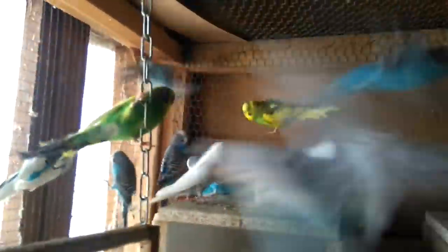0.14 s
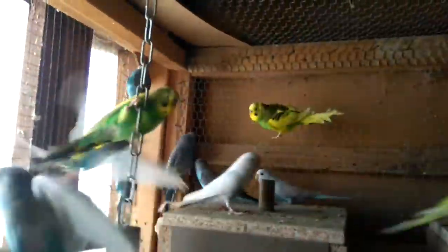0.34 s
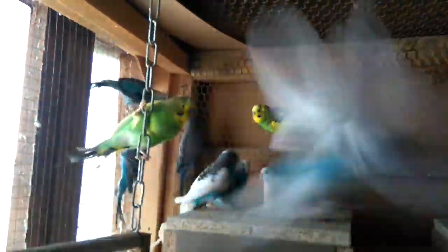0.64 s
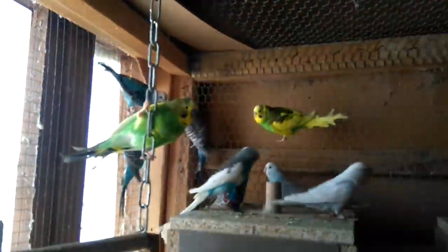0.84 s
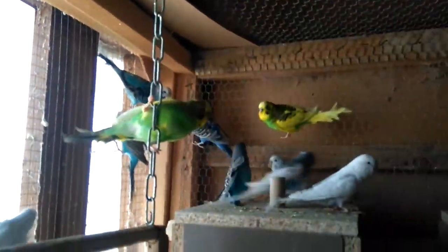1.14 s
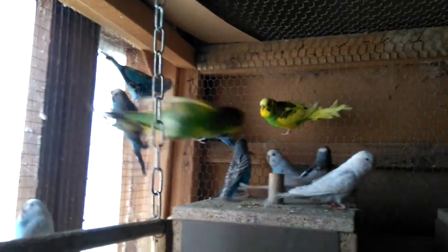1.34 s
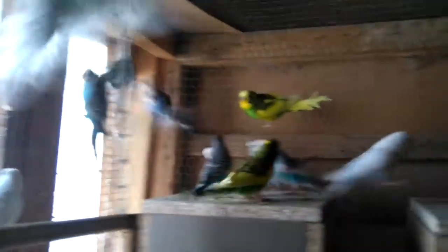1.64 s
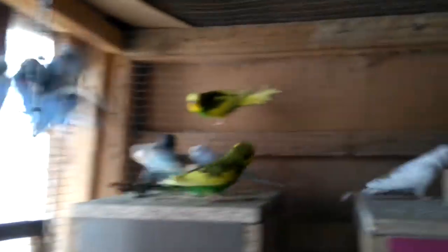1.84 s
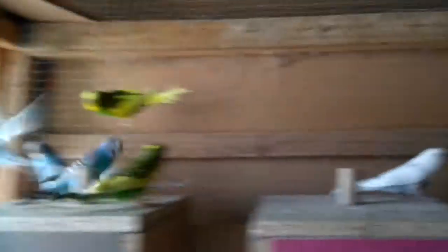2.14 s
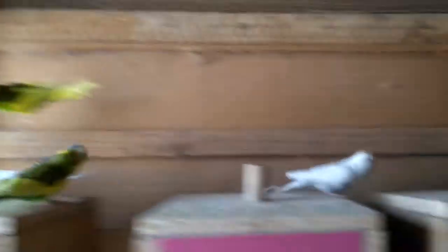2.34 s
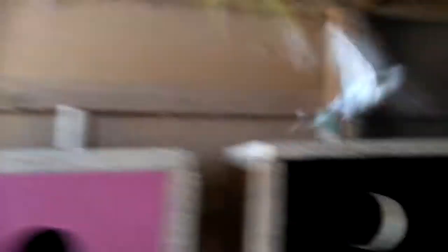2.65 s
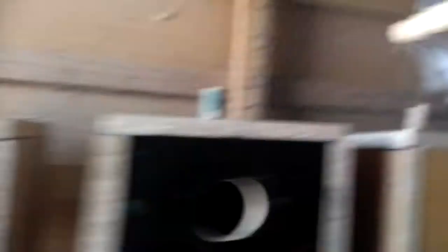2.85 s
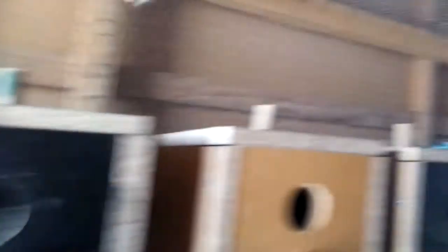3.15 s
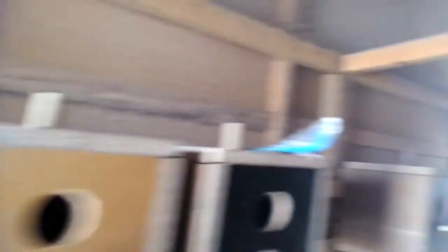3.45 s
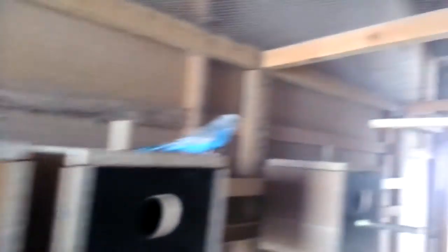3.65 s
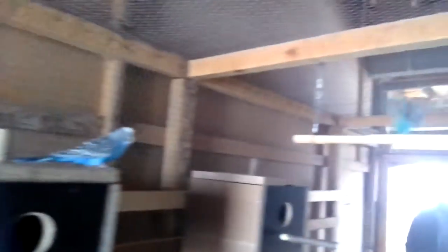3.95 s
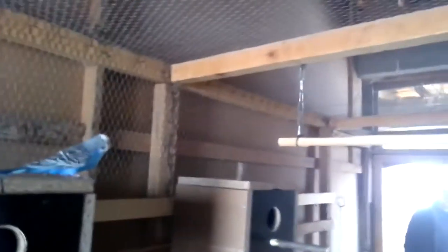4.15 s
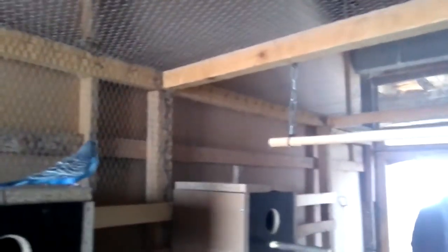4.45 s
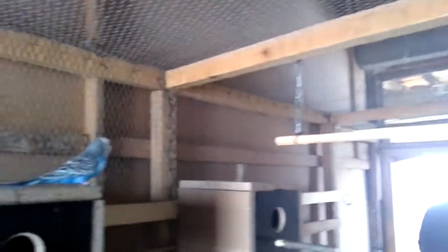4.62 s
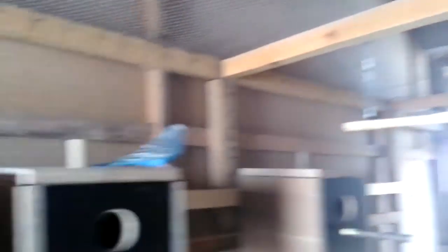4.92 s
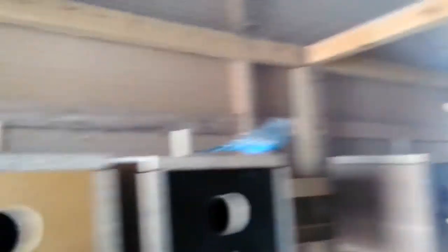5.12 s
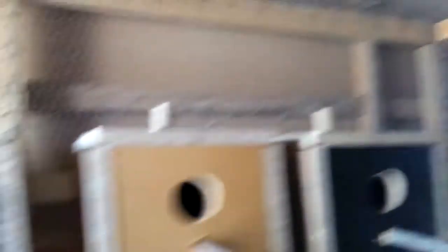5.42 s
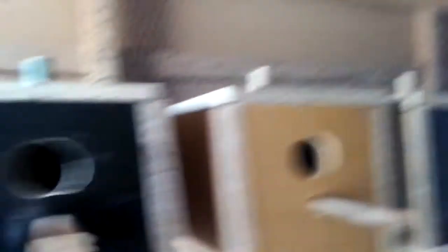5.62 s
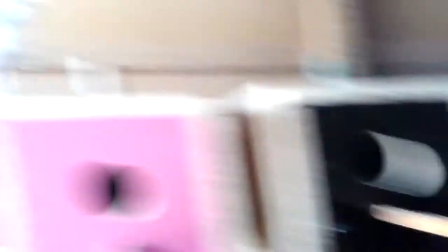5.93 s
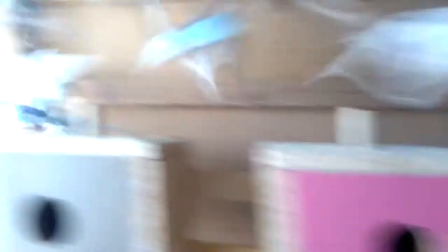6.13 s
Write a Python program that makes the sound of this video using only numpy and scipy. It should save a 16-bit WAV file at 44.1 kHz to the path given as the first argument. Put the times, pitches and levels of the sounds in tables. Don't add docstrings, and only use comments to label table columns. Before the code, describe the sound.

A flock of small parrots chirps, whistles and squawks inside a wooden aviary, with sharp wing claps, fluttering and soft knocks close to the microphone.

```python
import sys
import numpy as np
from scipy import signal
from scipy.fft import rfft, irfft
from scipy.io import wavfile
from scipy.ndimage import uniform_filter1d

SR = 44100
rng = np.random.default_rng(int(sys.argv[2]) if len(sys.argv) > 2 else 0)


def output_pcm(signal):
    pcm = np.clip(np.atleast_2d(signal).T, -1, 1) * 32767
    wavfile.write(sys.argv[1], SR, np.round(pcm).astype(np.int16))


def rack_gain(trim_db):
    fader = np.asarray(trim_db, float)
    return 10 ** (fader / 20)


N = 276948
LONGEST = 9000


def evened(x):
    return x / np.sqrt(np.mean(x ** 2) + 1e-20)


def read(points, hz):
    point_hz, value = np.transpose(points)
    return np.interp(np.log(hz + 1), np.log(point_hz + 1), value)


def columns(rows, t):
    start_s, *rest = np.transpose(rows)
    return [np.interp(t, start_s, column) for column in rest]


def add(mix, start_s, sound):
    part = mix[..., round(start_s * SR):][..., :sound.shape[-1]]
    part += sound[..., :part.shape[-1]]


def progress(length_s):
    return np.linspace(0, 1, min(round(length_s * SR), LONGEST))


def panned(pan_db):
    return rack_gain([[pan_db / 2], [-pan_db / 2]])


def wobble(count, hz):
    low_pass = signal.butter(2, hz, fs=SR, output="sos")
    settle = 999
    return evened(signal.sosfilt(low_pass, rng.standard_normal(count + settle))[settle:])


def band(x, lo_hz, hi_hz):
    band_pass = signal.butter(2, [lo_hz, min(hi_hz, 20000)], "bandpass", fs=SR, output="sos")
    return signal.sosfilt(band_pass, x)


def resonate(x, hz, width_hz):
    turn = np.exp(2j * np.pi * np.cumsum(hz * np.ones(len(x))) / SR)
    r = np.exp(-np.pi * width_hz / SR)
    return 2 * (turn * signal.lfilter([(1 - r) ** 2], [1, -2 * r, r * r], x / turn)).real


def note(row, waver, throb, throb_hz, partials_db):
    start_s, length_s, level_db, start_hz, end_hz = row
    u = progress(length_s)
    quick, slow, uneven = (wobble(LONGEST, hz)[:len(u)] for hz in (300., 60., 90.))
    glide_share = .33
    glide = (1 - np.exp(-u / glide_share)) / (1 - np.exp(-1 / glide_share))
    pitch_hz = (start_hz + (end_hz - start_hz) * glide) * (1 + waver * quick)
    phase = 2 * np.pi * np.cumsum(pitch_hz) / SR
    beat = np.cos(2 * np.pi * np.cumsum(throb_hz * (1 + 0.389 * slow)) / SR)
    tone = sum(rack_gain(db) * np.sin((k + 1) * phase) for k, db in enumerate(partials_db))
    chopped = tone * np.exp(throb * (beat + 0.83 * uneven))
    envelope = np.abs(np.sin(np.pi * u ** 0.56)) ** 0.91
    sound = rack_gain(level_db) * evened(chopped) * envelope
    return max(start_s, 0), sound[round(max(-start_s, 0) * SR):]


# start_s, length_s, level_db, start_hz, end_hz
LOW_WHISTLES = [(.152, 0.069, -25.5, 2606, 2910), (0.287, 0.038, -24, 2700, 3110),
                (0.329, 0.064, -20.5, 3097, 2817), (0.441, .055, -23, 2288, 2860),
                (0.537, .035, -32, 3110, 3180), (1.135, 0.024, -21.5, 2830, 2960),
                (1.188, 0.072, -31, 3070, 3140), (1.343, 0.1, -41, 3020, 3490),
                (1.423, 0.06, -37, 2960, 2940), (1.54, .055, -27, 2960, 2910),
                (1.586, 0.065, -26, 3040, 2980), (2.146, 0.049, -13.5, 2814, 2770),
                (2.251, 0.059, -19.5, 2847, 3000), (2.464, 0.034, -26, 2655, 2976),
                (2.519, 0.065, -33, 2685, 2560), (2.703, 0.023, -18, 2570, 2820),
                (3.551, 0.036, -20.5, 2435, 2690), (3.579, 0.032, -23, 3310, 3370),
                (3.651, 0.039, -21.5, 2880, 2866), (3.358, .09, -39, 2130, 2370),
                (3.697, 0.066, -36, 2797, 2830), (4.33, 0.17, -34, 2540, 2585),
                (4.428, 0.019, -14, 3360, 3323), (4.458, 0.045, -33, 3220, 3500),
                (4.495, 0.082, -28.5, 2575, 2630), (4.755, 0.024, -22.5, 2730, 2768),
                (4.83, 0.037, -22, 2500, 2514), (5.192, 0.04, -25.5, 2630, 2726),
                (5.218, 0.021, -24, 2020, 1950), (5.597, 0.12, -45, 5050, 4600),
                (5.807, 0.057, -36.5, 3750, 3480), (5.816, 0.04, -44, 1906, 1850),
                (5.867, 0.046, -37, 2910, 2820), (5.978, 0.03, -34, 3970, 4047)]
# start_s, length_s, level_db, start_hz, end_hz
MID_WHISTLES = [(0.091, 0.073, -21, 3950, 3690), (0.258, 0.035, -26, 3900, 3630),
                (0.445, 0.025, -28, 3950, 3970), (1.103, 0.02, -28, 3680, 3780),
                (1.16, 0.038, -28, 3970, 3495), (1.432, 0.066, -33, 3900, 3630),
                (1.642, 0.063, -22.5, 4350, 4150), (2.073, 0.033, -21, 3700, 2980),
                (2.081, .03, -25.5, 6500, 4380), (2.09, 0.089, -17.5, 4500, 3430),
                (2.62, .05, -24.5, 5100, 3620), (2.65, 0.081, -16, 3690, 3342),
                (3.585, .11, -18.5, 4620, 3312), (3.796, 0.097, -40, 3080, 3750),
                (4.657, .04, -32, 3980, 3920), (4.592, 0.062, -22.5, 4780, 4580)]
# start_s, length_s, level_db, pitch_hz
HIGH_WHISTLES = [(0.209, 0.046, -24, 5680), (1.454, 0.042, -29.5, 6800), (1.54, 0.06, -21, 5970),
                 (1.647, 0.065, -22.5, 5980), (1.878, 0.05, -28, 6700), (2.503, 0.11, -31, 6770),
                 (3.398, 0.054, -20.5, 6100), (3.457, 0.057, -19, 5930), (3.536, 0.063, -18, 5910),
                 (3.5, 0.063, -23, 6870), (4.357, .075, -25, 6420), (4.508, 0.036, -23, 6020),
                 (4.55, 0.079, -26.5, 6400), (4.756, 0.032, -19, 5870), (4.79, 0.056, -16.5, 6990),
                 (4.832, 0.12, -27.5, 6250), (4.762, 0.068, -20, 4750), (4.8, 0.15, -24.5, 4960),
                 (4.387, 0.11, -28, 4570), (5.28, 0.077, -39, 4630)]
# start_s, length_s, level_db, start_hz, end_hz
WARBLES = [(0.0, 0.037, -26.5, 2915, 3140), (0.093, 0.06, -25.5, 8030, 8000),
           (0.139, 0.076, -31, 2900, 2700), (0.479, 0.07, -26.5, 2145, 2052),
           (0.492, 0.064, -16, 2806, 3020), (1.148, 0.094, -34.5, 1947, 1834),
           (1.154, 0.085, -24.5, 2520, 2895), (1.867, 0.056, -44, 4900, 5070),
           (2.221, 0.13, -29, 2470, 2435), (2.492, 0.064, -25.5, 2610, 2580), (2.719, .11, -20, 6400, 5826),
           (2.9, 0.091, -24.5, 3000, 3100), (2.901, 0.09, -18, 5930, 7280),
           (2.938, 0.077, -20.5, 3400, 2880), (3.092, 0.092, -17.5, 6210, 7510),
           (3.109, 0.1, -26.5, 3594, 3300), (3.459, 0.23, -23.5, 3230, 3200),
           (3.478, .1, -21.5, 5450, 6620), (3.97, 0.19, -34.5, 4660, 5100),
           (4.441, 0.081, -20.5, 2900, 2882), (4.5, .06, -38, 7860, 7900),
           (4.597, 0.111, -27.5, 2750, 2990), (4.614, 0.075, -23.5, 3500, 3690),
           (4.823, .12, -23, 2837, 2887), (5.214, 0.086, -33, 2304, 2164),
           (5.227, 0.069, -23.5, 2790, 2800)]
# start_s, length_s, level_db, start_hz, end_hz
SCREECHES = [
    (1.854, 0.1, -33.5, 2400, 2530),
    (3.355, 0.12, -22.5, 2134, 2338),
    (3.97, 0.11, -25, 2433, 2560),
    (4.313, 0.15, -22, 2540, 2526),
    (4.519, 0.033, -13.5, 2655, 2648),
]


def calls():
    out = np.zeros(N)
    for row in LOW_WHISTLES:
        add(out, *note(row, 0.018, 0.19, 130.6, [0, -26]))
    for row in MID_WHISTLES:
        add(out, *note(row, 0.0356, 0.85, 153.5, [0, -15]))
    sag = 0.0131
    for *row, hz in HIGH_WHISTLES:
        add(out, *note([*row, hz * (1 + sag), hz * (1 - sag)], 0.014, 0.82, 163.5, [0, -25]))
    for row in WARBLES:
        add(out, *note(row, 0.0854, 0.51, 208.5, [0, -30]))
    for row in SCREECHES:
        add(out, *note(row, 0.017, 0.27, 172.0, [-14.0, -2.0, -11.5, -15.0]))
    return rack_gain(-2.0) * out


# peak_s, peak_db, pitch_hz
LOW_PIPS = [(0.106, -15, 4040), (0.129, -15.2, 3670), (0.139, -16, 3620), (0.162, -9, 2640),
            (0.191, -18, 2700), (0.274, -14, 3560), (0.301, -9, 2780), (0.315, -7, 2790),
            (0.323, -11, 2800), (0.331, -13, 3320), (0.364, -20, 3000), (0.469, -12, 2380),
            (0.482, -6, 2720), (0.489, -9, 2940), (0.502, -13, 2900), (0.529, -17, 2850),
            (0.535, -13, 2700), (1.151, -20, 2930), (1.194, -17.5, 3100), (1.554, -20, 2900),
            (1.688, -17.6, 4130), (2.094, -18, 2920), (2.116, -12, 3830), (2.125, -6, 3750),
            (2.148, -24, 3830), (2.157, -25, 2820), (2.171, -28, 2900), (2.188, -23, 2750),
            (2.268, -15, 2900), (2.282, -12, 2920), (2.295, -17, 2880), (2.534, -18, 2770),
            (2.663, -8.5, 3390), (2.67, -13, 3370), (2.68, -19, 3500), (2.691, -24, 3430),
            (2.701, -19, 3530), (2.71, -11, 2680), (2.715, -14, 2780), (2.909, -15, 3140),
            (2.934, -14, 2900), (2.967, -8, 4100), (3.399, -14, 4800), (3.422, -12, 4540),
            (3.428, -19.7, 4400), (3.588, -25, 3350), (3.613, -8, 4050), (3.623, -5.5, 3920),
            (3.64, -9, 3790), (3.675, -8.5, 2800), (4.444, -6.5, 3300), (4.469, -10, 3320),
            (4.489, -9.5, 3500), (4.636, -12, 2850), (4.672, -12, 4030), (4.68, -9, 3900),
            (4.771, -29, 2760), (4.863, -28, 2890), (4.907, -14.5, 2940), (5.219, -14, 2710)]
# peak_s, peak_db, pitch_hz
HIGH_PIPS = [(1.51, -29, 6500), (2.76, -12, 6060), (2.782, -11, 6980), (2.905, -10.5, 6220),
             (3.112, -14, 6200), (3.139, -12, 7410), (3.145, -14, 7430), (3.417, -13, 6220),
             (3.429, -19, 6200), (3.44, -20.4, 6100), (3.447, -17.5, 6140), (3.458, -15, 6200),
             (3.48, -5, 5780), (3.497, -11, 6100), (3.511, -16.7, 7000), (3.528, -10, 6270),
             (3.553, -10, 6040), (3.573, -4, 5470), (4.06, -23.6, 5000), (4.348, -6, 5060),
             (4.376, -15, 6460), (4.385, -17.9, 5000), (4.398, -18, 6420), (4.516, -17, 6080),
             (4.523, -25, 6030), (4.54, -11, 5300), (4.562, -21.6, 6460), (4.565, -20, 6500),
             (4.571, -19, 6370), (4.62, -20.7, 4770), (4.786, -23.5, 4760), (4.807, -16, 4930),
             (4.811, -12, 6660), (4.813, -21, 5030), (4.816, -18, 6960), (4.821, -7, 7200),
             (4.826, -10, 6860), (4.83, -15, 5000), (4.843, -17.8, 5050), (4.85, -15, 6300),
             (4.855, -17, 6200), (4.886, -17, 6200), (4.897, -21.5, 6300), (4.903, -22.7, 6300)]


def pips():
    out, t = np.zeros(N), np.arange(-300, 500) / SR
    rise_s, fall_s = 0.0034, 0.0022
    shape = np.exp(-(t / np.where(t < 0, rise_s, fall_s)) ** 2)
    for peak_s, db, hz in LOW_PIPS + HIGH_PIPS:
        tone = np.sin(2 * np.pi * (hz * t + rng.random()))
        add(out, peak_s + t[0], rack_gain(db - 3.5) * shape * tone)
    return out


# start_s, length_s, level_db, start_hz, end_hz
UNDERTONES = [
    (0.305, 0.058, -38, 2000, 2000),
    (0.495, .055, -31.5, 1700, 1800),
    (1.8, 0.026, -33, 1800, 1780),
    (2.672, 0.087, -37, 1800, 2000),
    (4, 0.051, -37, 1600, 1600),
    (5.815, 0.032, -37, 1900, 1800),
    (4.62, 0.034, -33, 8500, 8400),
    (2.09, 0.082, -31, 9200, 7500),
    (1.86, 0.059, -33, 2400, 2600),
]


def undertones():
    out = np.zeros(N)
    for row in UNDERTONES:
        add(out, *note(row, 0.04, 0.66, 178.6, [0, -30]))
    return out


# peak_s, spread_s, upper_throat_db, lower_throat_relative_db
SQUAWKS = [(-.005, 0.02, -30.5, 14), (0.133, 0.078, -31, 8), (0.228, 0.037, -20, -1.5),
           (.32, 0.066, -35, 13.5), (.5, 0.3, -42, 3), (1.175, 0.1, -41, 10.5), (1.574, 0.074, -21, 3),
           (1.678, 0.051, -23.5, -6.5), (1.85, 0.077, -38.5, -1), (1.945, 0.086, -41, -9),
           (2.125, 0.047, -32.5, 5), (2.279, 0.089, -36.5, 10), (2.523, 0.089, -35.5, 5.5),
           (2.659, 0.059, -37.5, 12.5), (2.754, 0.081, -19, -4.5), (2.936, 0.096, -21.5, -1.5),
           (3.129, 0.067, -20, -5.5), (3.51, 0.13, -21, -3), (3.68, .12, -35.5, 3.5),
           (4.016, 0.14, -32, -5), (4.392, 0.089, -27.5, -10), (4.55, 0.23, -31.5, -3),
           (4.665, 0.084, -32, 10.5), (4.806, 0.1, -19, -7.5), (5.16, 0.086, -35.5, -1.5),
           (5.26, 0.18, -38, 4.5), (5.5, 0.097, -42, 5), (5.638, 0.1, -43.5, 3.5), (6, 0.048, -39, 0),
           (6.2, 0.27, -38, -16)]
# start_s, level_db
CHATTER = [(0, -40.5), (.65, -41.5), (.95, -53), (1.08, -46.5), (1.32, -48.5), (1.46, -39.5), (1.78, -50.5),
           (2.2, -37.5), (2.42, -46), (3.27, -44.5), (3.8, -48.5), (4.28, -40.5), (4.96, -38.5),
           (5.07, -56), (5.42, -47), (5.72, -63), (5.84, -46.5), (5.94, -66)]


def effort():
    t = np.arange(0, N + 64, 64) / SR
    peak_s, spread_s, db, low_db = np.transpose(SQUAWKS)[:, :, None]
    u = np.maximum((peak_s - t) / spread_s, (t - peak_s) / (spread_s * 0.88))
    fall_db, pointed = 26, 2.44
    each = rack_gain(db - fall_db * u ** pointed)
    each = each + rack_gain(db - 18 - fall_db * (u / 1.84) ** pointed)
    murmur = rack_gain(columns(CHATTER, t)[0])
    upper = np.sqrt((each ** 2).sum(0) + murmur ** 2)
    lower = np.sqrt(((each * rack_gain(low_db)) ** 2).sum(0) + (murmur * rack_gain(5.5)) ** 2)
    return [np.interp(np.arange(N) / SR, t, gain) for gain in (upper, lower)]


def squawks():
    upper_gain, lower_gain = effort()
    over_db = np.clip(20 * np.log10(upper_gain) + 20, -25, 5)
    throat_hz = 6500 - 38 * over_db
    turns = np.cumsum(450 * np.exp(.45 * wobble(N, 150))) / SR
    puff = 0.38 + np.exp(-(turns % 1) / 0.087)
    drive = puff * rack_gain(3.25 * wobble(N, 112)) * rng.standard_normal(N)
    upper = evened(resonate(drive, throat_hz, 4870)) + rack_gain(1.0) * evened(resonate(drive, 8500, 3100))
    upper += rack_gain(-15.5 - 0.37 * over_db) * evened(band(drive, 10100, 12160))
    lower = evened(resonate(drive, 2735, 1630)) - rack_gain(-11.5) * evened(resonate(drive, 3950, 1100))
    gape = rack_gain(-1.5 + 0.16 * over_db) * evened(resonate(drive, 4750, 2370))
    voice = upper_gain * (evened(upper) - gape) + lower_gain * rack_gain(-3.5) * evened(lower)
    return band(voice, 1570, 13700)


# start_s, peak_db, body_relative_db
CLAPS = [(0.216, -16, 3), (1.503, 0, -9.5), (1.507, -10, -8), (1.6599, -25, -6), (1.826, -18, -7),
         (1.833, -8, -0.5), (1.8392, -16, -9), (1.8816, -14, -9), (1.9381, -10.5, -7), (1.947, -11, -3),
         (1.9921, -12, -1), (2.0534, -15.5, -4), (2.128, -10, -3.5), (3.0713, -19, 5.5), (5.752, -50, 11),
         (6.0975, -16.5, 4.5), (6.1679, -13, -10), (6.2274, -13, -7)]


def claps():
    out, t = np.zeros(N), np.arange(1500) / SR
    envelope = np.exp(-t / 0.0035) * np.minimum(t / 0.00037, 1)
    for start_s, db, body_db in CLAPS:
        hiss = rng.standard_normal(len(t))
        crack = evened(band(hiss, 6300, 11200))
        body = rack_gain(body_db) * evened(band(hiss, 650, 4800))
        add(out, start_s, rack_gain(db - 6.5) * (crack + body) * envelope)
    return out


# start_s, length_s, level_db
RUFFLES = [
    (5.745, 0.12, -36),
    (4.7, 0.074, -45.5),
    (0.12, 0.15, -37.5),
    (2.2, 0.094, -40),
]


def ruffles():
    out = np.zeros(N)
    for start_s, length_s, db in RUFFLES:
        crackle = rng.standard_normal(LONGEST) * rack_gain(2.6 * wobble(LONGEST, 130.0))
        u = progress(length_s)
        swell = np.sin(np.pi * u ** 0.68)
        add(out, start_s, rack_gain(db) * evened(band(crackle, 440, 2550))[:len(u)] * swell)
    return out


# start_s, peak_db, pitch_hz, left_right_db
KNOCKS = [(0.125, -31, 365, -1.5), (1.812, -22, 544, 2), (2.155, -22, 425, -4), (2.18, -25, 487, 0.0),
          (2.25, -26, 460, 26), (2.277, -22, 290, 10), (2.458, -16, 460, -15.5), (2.763, -22.5, 333, -9),
          (2.871, -26, 480, 0.0), (5.806, -44, 500, 6.5), (6.088, -23.5, 544, -0.5),
          (6.123, -19.5, 520, 0.0), (6.165, -31, 453, 0.5), (6.2, -20, 490, 0.0), (6.242, -30, 324, -1)]


def knocks():
    out, t = np.zeros((2, N)), np.arange(1200) / SR
    envelope = np.exp(-t / 0.0035) * (1 - np.exp(-t / 0.0022))
    for start_s, db, hz, pan_db in KNOCKS:
        thud = np.sin(2 * np.pi * hz * t) * envelope
        add(out, start_s, rack_gain(db - 1.0) * panned(pan_db) * thud)
    return out


# start_s, peak_db, left_right_db
PUFFS = [(1.082, -25, 2), (1.542, -23, 10), (1.598, -33, 3.0), (1.7, -29, 4), (2.145, -22.5, 23),
         (2.25, -21, 27), (2.281, -23, 4.5), (2.403, -24, -15), (2.458, -19.5, -25), (2.52, -26, 12),
         (2.65, -19, -17), (2.7, -23, 17), (2.797, -17.5, 26), (5.729, -30, 13)]


def puffs():
    out, t = np.zeros((2, N)), np.arange(3000) / SR
    swing = np.sin(2 * np.pi * 3.3 * (1 - np.exp(-t / 0.017)))
    swing *= np.exp(-t / 0.0045) * (1 - np.exp(-t / 0.0019))
    for start_s, db, pan_db in PUFFS:
        add(out, start_s, rack_gain(db - 7.5) * panned(pan_db) * swing)
    return out


# start_s, length_s, level_db
BOX_HUMS = [
    (0, 0.086, -36),
    (0.121, 0.18, -37),
    (.27, 0.23, -44),
]


def box_hums():
    out = np.zeros(N)
    for start_s, length_s, db in BOX_HUMS:
        hum = evened(resonate(rng.standard_normal(LONGEST), hz=542, width_hz=97))
        u = progress(length_s)
        add(out, start_s, rack_gain(db) * hum[:len(u)] * np.sin(np.pi * u ** 0.5))
    return out


# start_s, level_db, nearness_db
WINGS = [(0.0, -37, -17), (0.7, -45, -11), (1.33, -44, -17.5), (1.64, -39, -1.5), (2.06, -40, -17.5),
         (2.17, -41.5, 0), (2.36, -39, -25), (2.41, -42, -3.5), (2.66, -38.5, -7), (3.25, -45, -12.5),
         (4.06, -46, -15), (4.67, -54.5, -11.5), (5.39, -43.5, -23.5), (5.72, -50, -5), (5.75, -44.5, -10),
         (5.95, -50, -16), (6.12, -36.5, -19.5), (6.28, -33, -19)]
# frequency_hz, density_db
AIR = [(20, -30), (35, -4.5), (62, 3.5), (110, -13.5), (200, -7.5), (320, -7.5), (500, -5.5), (900, -11),
       (1300, -11), (2000, -13), (3800, -12), (4900, -24), (7000, -28), (13000, -29)]
# frequency_hz, correlation_ratio
SAME = [
    (60, .6),
    (150, .52),
    (300, .73),
    (650, .62),
    (1300, -.4),
    (3000, .0),
]


def wings():
    frames, hz = N // 256 + 5, np.fft.rfftfreq(1024, 1 / SR)[:, None]
    a, b, c, d, patches = rng.standard_normal((frames, 513, 5)).T
    patches = evened(uniform_filter1d(uniform_filter1d(patches, 9, 0), 7, 1))
    beats = evened(uniform_filter1d(rng.standard_normal(frames), 4))
    level_db, deep_db = columns(WINGS, np.arange(frames) * 256 / SR)
    rustle_db = -1 - 0.34 * (level_db + 40.0)
    deep = 1 / (1 + (hz / 150) ** 4)
    rustle = 1 / (1 + (1300 / (hz + 1)) ** 4)
    same, left = np.clip(read(SAME, hz), -1, 1), a + 1j * b
    right = same * left + np.sqrt(1 - same ** 2) * (c + 1j * d)
    gain_db = read(AIR, hz) + level_db + deep * (deep_db + 12) + rustle * rustle_db
    gain_db = gain_db + 2.34 * patches + 0.58 * beats
    air = np.array([left, right]) * rack_gain(gain_db)
    return rack_gain(-5.0) * signal.istft(air, nperseg=1024, noverlap=768)[1][:, :N]


# frequency_hz, t60_s
HOUSE = [
    (300, 0.081),
    (2000, 0.12),
    (5000, 0.15),
    (12000, 0.064),
]


def echoes():
    taps = np.zeros((2, SR // 2))
    at = np.arange(80, SR // 2 - 20, 20) + rng.integers(0, 20, (2, (SR // 2 - 81) // 20))
    np.put_along_axis(taps, at, rng.choice([-1., 1.], at.shape), 1)
    hz, t, z = signal.stft(taps, SR, nperseg=128)
    decay_db = -60 * t / read(HOUSE, hz)[:, None]
    tail = signal.istft(z * rack_gain(decay_db), SR, nperseg=128)[1]
    return tail / np.linalg.norm(tail[0])


def house(x):
    turn = 2 * np.pi * 7.5 * np.arange(N) / SR
    shares = [np.sqrt(2 / 3) * np.cos(turn + k * np.pi / 3) for k in range(3)]
    return sum(signal.oaconvolve((x * share)[None], echoes(), axes=1)[:, :N] for share in shares)


def scene():
    voices = calls() + squawks()
    slaps = claps() + ruffles()
    close = pips()
    voices = voices + undertones()
    near = voices + rack_gain(5.0) * close + rack_gain(2.0) * slaps
    direct = rack_gain(-6.5) * np.array([near, np.roll(near, 13)])
    echoed = rack_gain(-1.0) * house(voices + rack_gain(-4.5) * close + rack_gain(-2.5) * slaps)
    return direct + echoed + wings() + puffs() + knocks() + box_hums()


def top_cut(x):
    return signal.sosfilt(signal.butter(12, 15260, fs=SR, output="sos"), x)


# frequency_hz, gain_db
SHADE = [
    (100, 0),
    (700, 0),
    (2300, 1.52),
    (8000, 2.37),
    (14000, -2.5),
]


def record(dry):
    hz = np.fft.rfftfreq(N, 1 / SR)
    dip_db = 4 * np.exp(-((hz - 5200) / 450) ** 2)
    colour_db = read(SHADE, hz) * np.array([[1], [-1]]) + 1.8 - dip_db
    limit = .9
    x = limit * np.tanh(irfft(rfft(dry) * rack_gain(colour_db), N) / limit)
    x = irfft(rfft(x) * rack_gain(-40 / (1 + (14900 / (hz + 1)) ** 50)), N)
    x = signal.sosfilt(signal.butter(5, 48, "highpass", fs=SR, output="sos"), x)
    return top_cut(x)


dry = scene()
out = record(dry)
output_pcm(out)
```